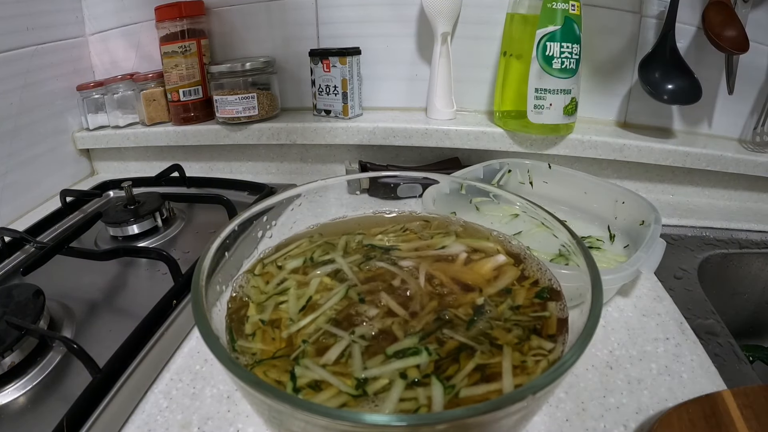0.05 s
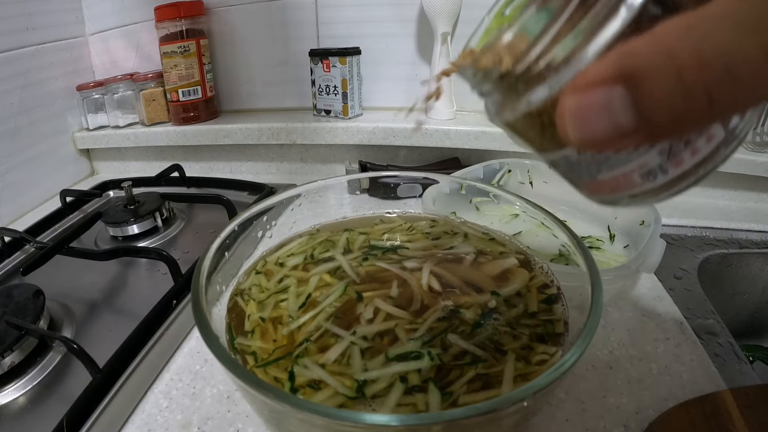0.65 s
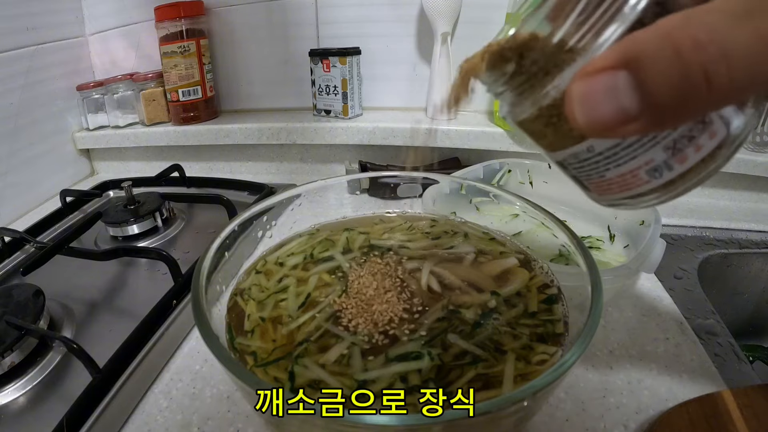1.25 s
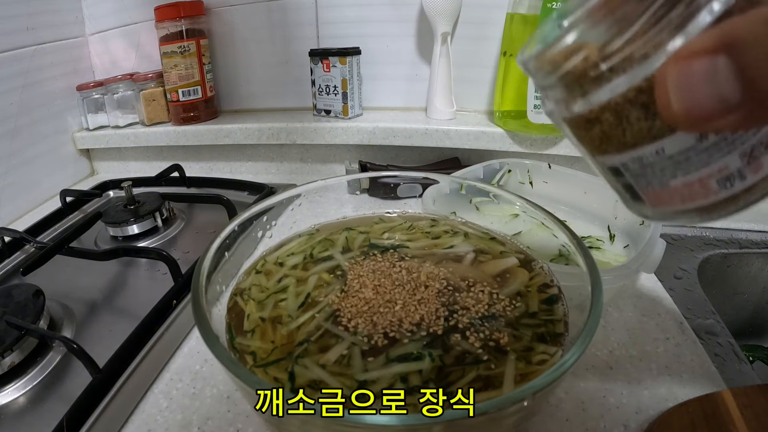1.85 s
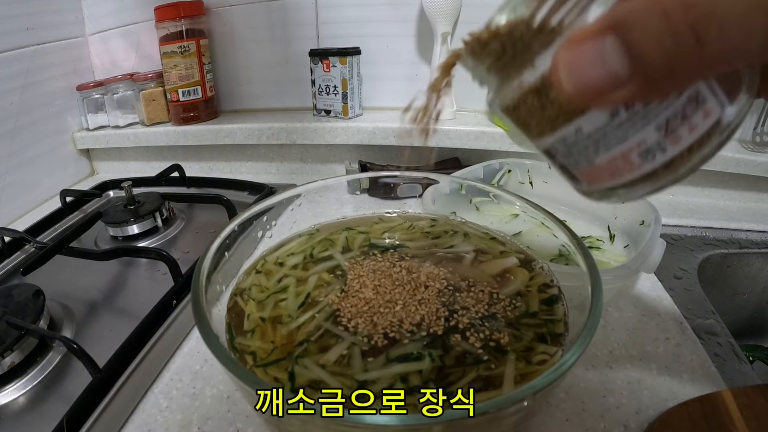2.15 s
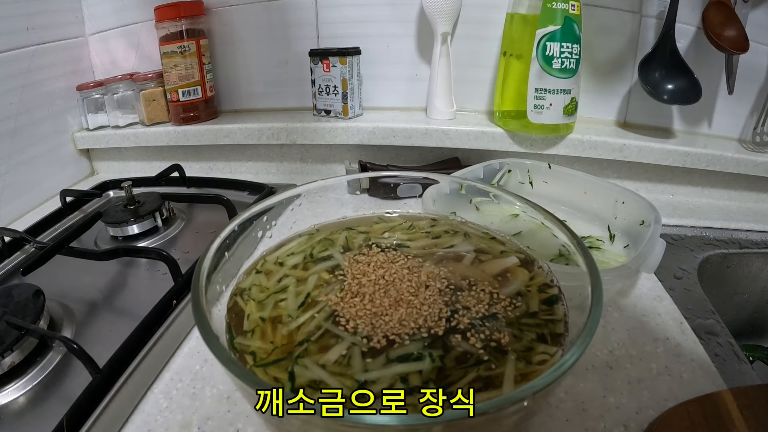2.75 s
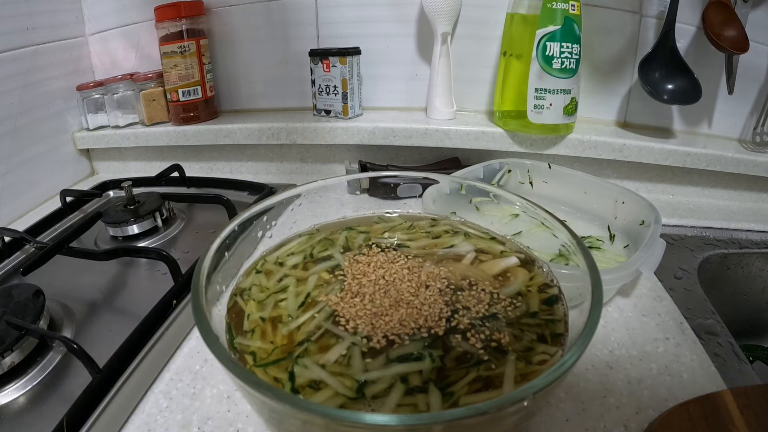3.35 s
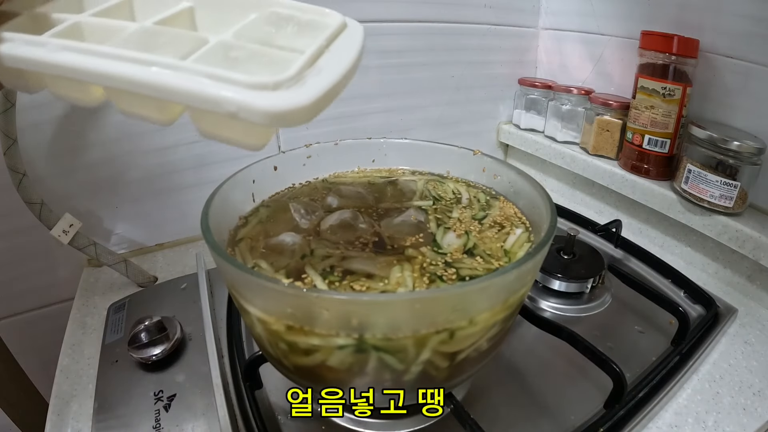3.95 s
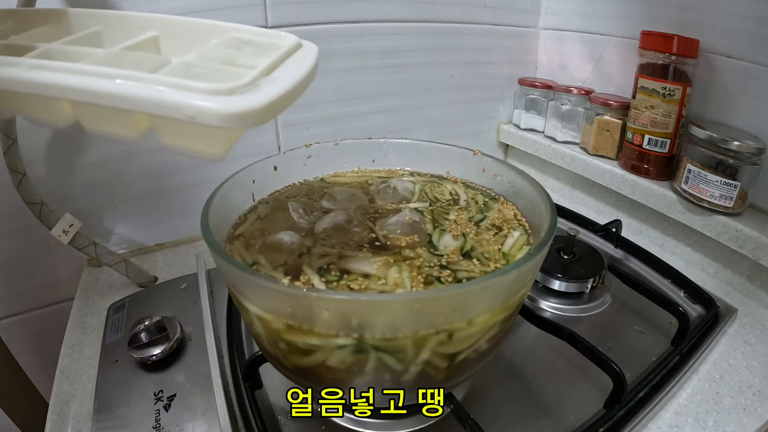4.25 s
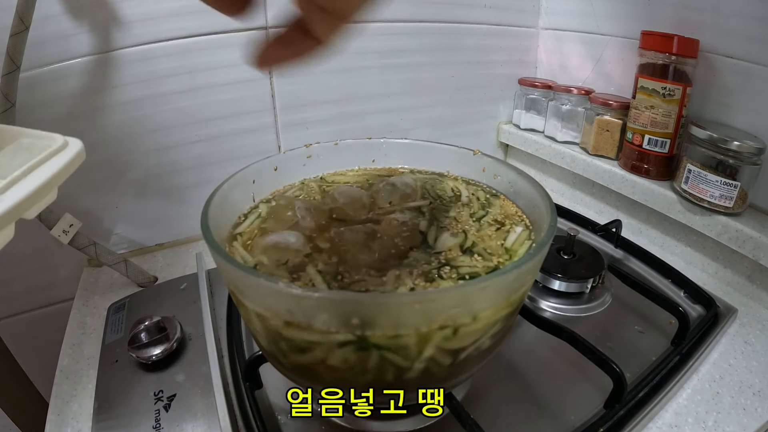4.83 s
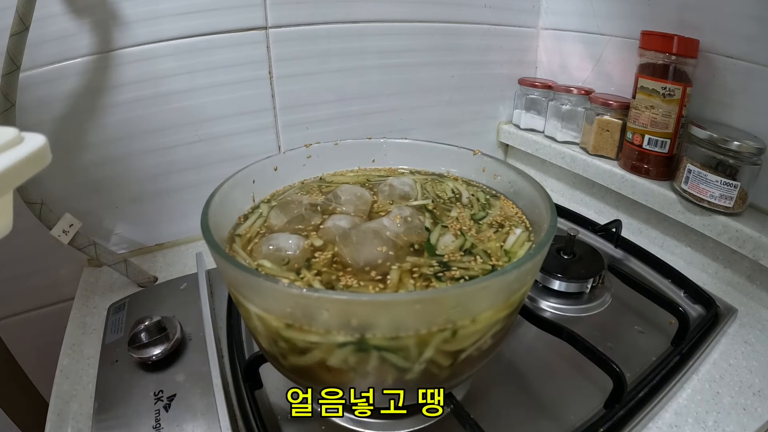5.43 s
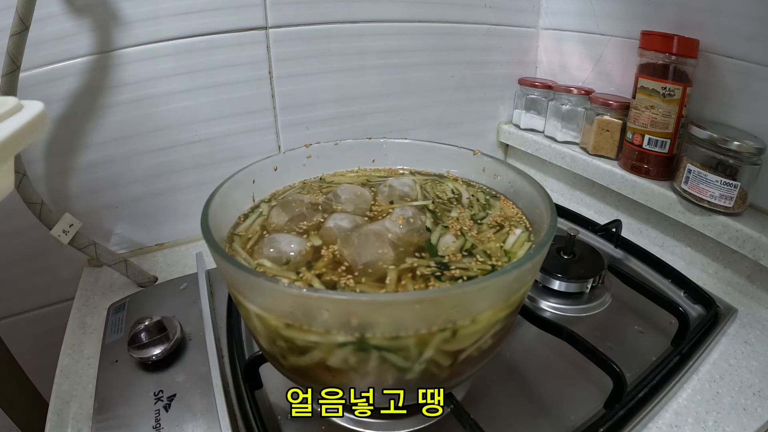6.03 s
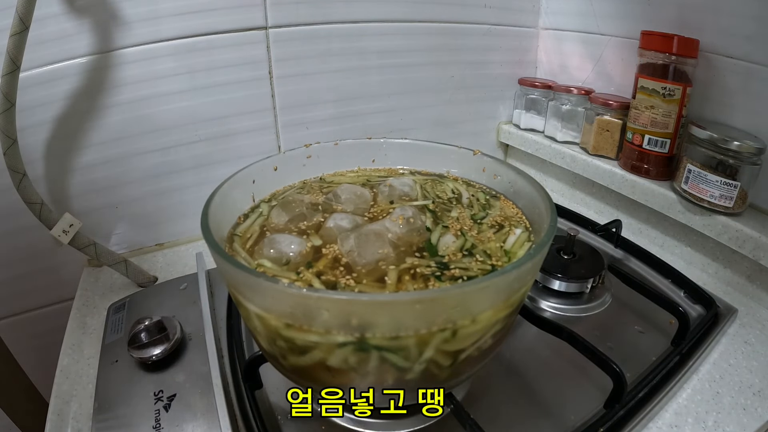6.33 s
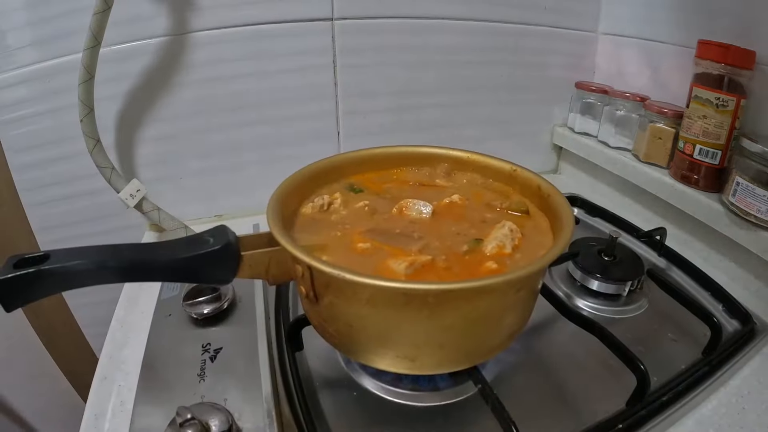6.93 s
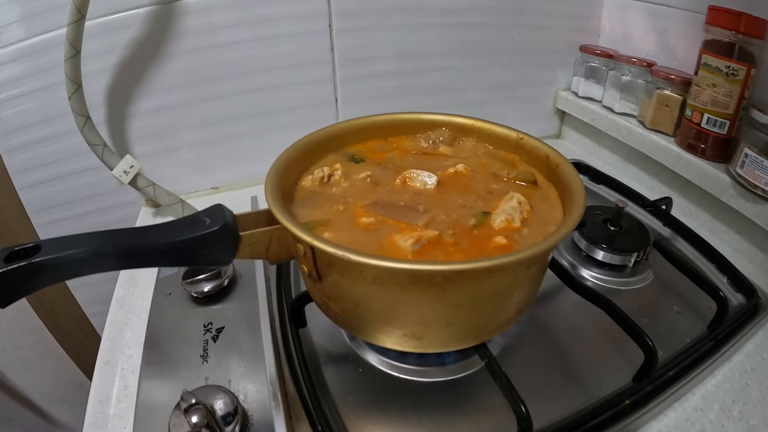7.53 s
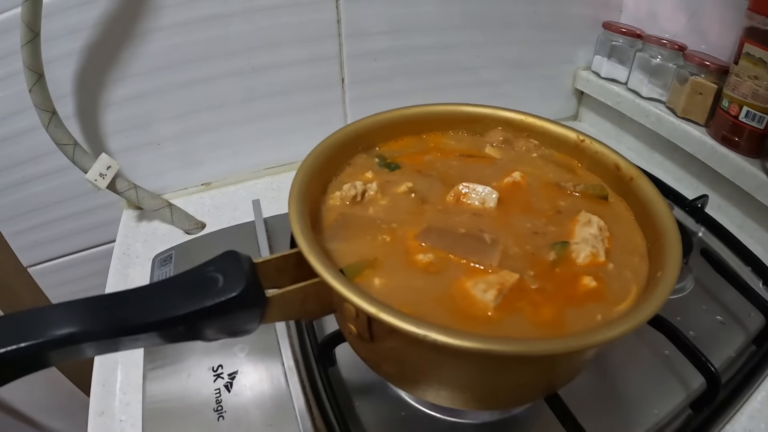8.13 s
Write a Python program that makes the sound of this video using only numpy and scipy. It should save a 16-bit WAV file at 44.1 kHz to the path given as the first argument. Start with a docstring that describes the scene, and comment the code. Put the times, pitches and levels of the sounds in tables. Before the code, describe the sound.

Seeds shaken from a glass jar, then ice cubes crack and clatter in a twisted plastic tray, before a gas burner roars softly.

```python
"""Ice cubes clatter, scrape and snap as a plastic tray is twisted; one plops into a glass bowl of cold
soup. Before that, in the same small tiled kitchen, a glass jar is picked up, sesame is shaken from it
onto the soup and the jar is set down. An appliance hums behind both scenes.
Last, after a short silence, a gas burner roars under a simmering stew."""
import sys
import numpy as np
from scipy import signal
from scipy.fft import rfft, irfft, next_fast_len
from scipy.io import wavfile
from scipy.ndimage import map_coordinates

SR = 44100
rng = np.random.default_rng(int(sys.argv[2]) if len(sys.argv) > 2 else 0)


def unload_audio(sound):
    """Save the sound as a 16-bit wav file, at the path given as the first command line argument."""
    columns = np.transpose(np.atleast_2d(sound))
    # keep every value between -1 and 1, then stretch to whole-number steps
    steps = np.round(np.clip(columns, -1, 1) * 32767)
    wavfile.write(sys.argv[1], SR, steps.astype(np.int16))


N = 360738
RING_SIZE = 16384  # samples in one hit or impulse response
T, RING_T, RING_HZ = np.arange(N) / SR, np.arange(RING_SIZE) / SR, np.fft.rfftfreq(RING_SIZE, 1 / SR)


# sharp, bright cracks of ice: start_s, level_db, low_edge_hz
ICE_CRACKS = [(3.5253, -9, 2320), (3.7972, 4.5, 1370), (3.8978, 4, 2120), (4.246, 9.5, 1850),
              (4.2961, 4, 1480), (4.525, -3.5, 3100), (4.866, -6, 4040), (4.9317, 4, 1360),
              (5.115, -24, 4000), (5.2533, 3.5, 1270), (5.3109, -4, 4600), (5.419, 4, 2800),
              (5.5784, -3, 2780), (6.0727, 0, 1820), (6.1794, 2.5, 1720), (6.462, -16.5, 4370),
              (6.784, -6.5, 3980)]
# whole cubes knocking in the tray or the bowl; the last row is a 2 kHz ring under a scrape: start_s, level_db,
# pitch_hz
CUBE_HITS = [(3.5722, 4.5, 1215), (3.9635, 6, 1493), (4.828, 3.5, 2030), (4.849, 1.5, 2165),
             (6.296, -5, 2010)]
# a cube goes under: start_s, level_db, t60_s
CUBE_DUNKS = [(4.25, -23.5, 0.016), (4.829, -32.5, 0.35)]
# tone of the gulp: freq_hz, gain_db
GULP_EQ = [(50, -9), (120, -15.5), (240, -10.5), (360, -32), (1500, -42.5)]

def ice():
    """Ice snaps as the tray is bent, cubes knock and ring; a sinking cube shoves soup aside: a gulp."""
    cracks = [(s, db, low_hz, 7840) for s, db, low_hz in ICE_CRACKS]
    cubes = [(s, db, hz, hz) for s, db, hz in CUBE_HITS]
    ring = np.zeros(N)
    for s, db, hz in CUBE_HITS:
        tone = np.sin(2 * np.pi * hz * RING_T + wobble(200, size=RING_SIZE))
        add(ring, s, amp(db - 29) * decay(0.11) * tone)
    push = sum(amp(db - 60 * np.abs(T - s) / t60) * (T > s) for s, db, t60 in CUBE_DUNKS)
    cracking = snaps(cracks, level_db=-2, t60=0.0059, wet_db=-1, pan_db=0.5)
    knocking = snaps(cubes, level_db=-2, t60=0.0073, wet_db=-1, pan_db=-0.5)
    return cracking + knocking + ring + push * eq_noise(GULP_EQ)


def snaps(rows, level_db, t60, wet_db, pan_db):
    """A sudden release: a spike and a few milliseconds of noise, coloured anew each time."""
    out = np.zeros((2, N))
    for s, db, low_hz, high_hz in rows:
        burst = rng.standard_normal(RING_SIZE) * decay(t60)
        burst[0] += 3.5  # the leading spike
        click = colour(burst, band(low_hz, high_hz, 4.14) + 0.17 * band(1200, 3600, 2.16))
        send_db = wet_db - max(db - 4.5, 0)  # the loudest snaps are drier
        add(out, s, kitchen(amp(db + level_db) * click / np.linalg.norm(click), send_db, pan_db))
    return out


# twists that break the cubes loose: start_s, level_db, high_edge_hz
TWISTS = [(3.571, -17, 6500), (3.693, -20.5, 1900), (3.707, -23, 2580)]
# body of the loaded tray: freq_hz, gain_db
TRAY_EQ = [(250, -22), (480, -7), (650, -3), (860, -9.5), (1150, -2.5), (1500, -5), (1780, -4.5),
           (2400, -5.5), (4300, -8), (10000, -26)]

def twists():
    """The tray gives way: cubes clatter densely in their cells and the plastic rings on, duller."""
    out = np.zeros(N)
    for s, db, top_hz in TWISTS:
        clatter, ring_out = (db, 0.17, top_hz), (db - 12, 0.81, 1900)
        for level_db, t60, edge_hz in (clatter, ring_out):
            contacts = amp(level_db) * decay(t60) * grains(2500, 2.9, size=RING_SIZE)
            add(out, s, excite(contacts, eq(TRAY_EQ) * band(100, edge_hz, 1.8)))
    return kitchen(amp(-2) * out, wet_db=-4, pan_db=3.5)


# cubes creaking in the tray: start_s, level_db, length_s
CUBE_SCRAPES = [(3.813, -14.5, 0.0063), (4.076, -16.5, 0.0083), (4.113, -28, 0.023), (4.172, -32, 0.015),
                (4.222, -23.5, 0.016), (4.488, -34, 0.0063), (5.187, -24, 0.018), (5.204, -19.5, 0.014),
                (5.233, -22.5, 0.0083), (5.367, -18.5, .013), (5.38, -19, 0.014), (5.408, -10.5, 0.0045),
                (5.527, -26.5, 0.0095), (5.552, -26.5, 0.012), (5.679, -37, 0.018), (5.763, -32.5, 0.018),
                (5.855, -33.5, 0.022), (5.888, -21.5, 0.022), (6.291, -17.5, 0.02), (6.341, -24.5, 0.021),
                (6.675, -34.5, 0.009), (6.787, -27, 0.013), (6.896, -34.5, 0.014)]
# tone of ice on plastic: freq_hz, gain_db
RUB_EQ = [(400, -19), (850, -20), (1630, -6), (2800, -9.5), (6300, -5.5), (8760, -17.5), (13000, -29),
          (16000, -47)]

def scrapes():
    """Loose cubes jostle in the tilted tray, tick while it is held bent and rub on the plastic."""
    creep = amp(-57.5) * swell(5.98, half_s=0.64) * grains(49, 4.6)
    jostle = amp(-41.5) * swell(3.79, half_s=0.18) * grains(500, 6.7)
    hollow = filtered(jostle, lambda hz: amp(-1) + resonances([(1300, 450, 3)], hz))
    rubbing = excite(creep + hollow, eq(RUB_EQ))
    for s, db, length_s in CUBE_SCRAPES:
        add(rubbing, s, amp(db) * stick_slip(length_s))
    return kitchen(rubbing, wet_db=1, pan_db=4.5)


def stick_slip(length_s):
    """Ice sticks and slips on plastic in uneven spurts; every stroke has a colour of its own."""
    force = np.exp(-(RING_T / length_s) ** 2) * (1 - np.exp(-RING_T / 0.0013))
    spurts = amp(3 * wobble(224, size=RING_SIZE))
    slips = force * spurts * grains(2600, 5, size=RING_SIZE)
    tone = eq(RUB_EQ) * amp(3.2 * wobble(96, size=len(RING_HZ)))
    return amp(-10.5) * np.sqrt(np.mean(force ** 2)) * colour(unit(slips), tone)


# the jar is picked up, later set down: start_s, level_db, hardness_db
JAR_HITS = [(0.003, -28.5, 2), (0.023, -30.5, 1), (0.13, -38, -2), (0.183, -35, -5.5), (0.199, -49, -3),
            (0.234, -36.5, 5), (0.393, -39, 0), (0.4192, -29, 1), (0.4316, -24, 5.5), (0.515, -38, -2),
            (3.177, -15.5, 11), (3.189, -9, -2), (3.265, -23.5, 2), (3.2919, -17, 1), (3.4086, -27, -2.5),
            (3.429, -21, -4), (3.4464, -16.5, 0)]
# modes of the jar on the shelf: pitch_hz, level_db, t60_s
SHELF_MODES = [(117, -2, 0.15), (266.6, -7.5, 0.12), (396, 7.5, 0.025), (507, -8, 0.08), (930, -20, 0.18),
               (2064, -10, 0.084), (2480, -24, 0.5), (3410, 7, 0.011), (4545, -23, 0.49)]
# modes of the jar on the counter: pitch_hz, level_db, t60_s
COUNTER_MODES = [(271.6, 1.5, 0.14), (373, -3, 0.044), (553, 0, 0.064), (677, -10, 0.2), (1223, -1, 0.14),
                 (1527, -1, 0.034), (2090, 1.5, 0.086), (2403, 6, 0.065), (2540, -4.5, 0.099),
                 (2990, 1.5, 0.07), (4580, 1.5, 0.099), (5500, 5.5, 0.066), (6830, 4.5, 0.11)]
# slides along the shelf: centre_s, level_db, half_length_s
JAR_DRAGS = [(0.074, -46, 0.087), (0.37, -50.5, 0.04), (0.54, -44, 0.038)]

def jar():
    """The glass jar drags and knocks on the shelf; set down, it rings and grinds into place."""
    hits = np.array(JAR_HITS)
    lifted = hits[:, 0] < 1
    pick_up = knocks(hits[lifted], SHELF_MODES, press=0, low_hz=98, thud_db=21, clack_db=18.5,
                     edge_db=10.5, rattle_db=8, rattle_t60=0.079, wet_db=3, pan_db=1.5)
    set_down = knocks(hits[~lifted], COUNTER_MODES, press=0.46, low_hz=212, thud_db=14.5, clack_db=16.5,
                      edge_db=10, rattle_db=11, rattle_t60=0.13, wet_db=-3.5, pan_db=3)
    sliding = sum(amp(db) * swell(s, half_s) for s, db, half_s in JAR_DRAGS)
    drag_peaks = [(hz, 0.12 * hz, -15 * np.log10(hz)) for hz, _, _ in SHELF_MODES]
    drag = sliding * noise(lambda hz: resonances(drag_peaks, hz))
    grind = amp(-27) * swell(3.46, half_s=0.013) * noise(lambda hz: resonances([(2150, 560, 0)], hz) ** 2)
    return pick_up + set_down + drag + grind


def knocks(rows, modes, press, low_hz, thud_db, clack_db, edge_db, rattle_db, rattle_t60, wet_db, pan_db):
    """Each hit rings the modes and rattles; a harder contact has more edge and less thud."""
    out = np.zeros((2, N))
    for s, db, hard_db in rows:
        sound = np.zeros(N)
        # as the hand presses down, later hits ring shorter and lose low end
        grip = 1 + press * (s - rows[0, 0]) / (rows[-1, 0] - rows[0, 0])
        edges_hz = [(low_hz * grip, 690), (1000, 3060), (3900, 6170)]  # thud, clack, edge
        levels_db = [thud_db - hard_db, clack_db + 0.29 * hard_db, edge_db + hard_db]
        for touch_s, touch_db in [(s, db), (s + 0.015, db - 11)]:  # it rocks and touches again
            ring = np.zeros(RING_SIZE)
            for hz, mode_db, t60 in modes:
                envelope = amp(mode_db + rng.normal(0, 1.5)) * decay(t60 / grip)
                ring += envelope * np.sin(2 * np.pi * hz * (1 + rng.normal(0, 0.008)) * RING_T)
            rattle = amp(rattle_db) * decay(rattle_t60 / grip) * grains(5000, 13, size=RING_SIZE)
            for (low, high), band_db in zip(edges_hz, levels_db):
                layer = colour(ring + rattle, band(low, high, 3.98))
                add(sound, touch_s, amp(touch_db + band_db) * layer / np.linalg.norm(layer))
        out += kitchen(sound, wet_db, pan_db)
    return out


# shakes of the jar: centre_s, level_db, half_length_s, spill_share
JAR_SHAKES = [(0.711, -46.5, 0.015, 0), (0.933, -49, 0.014, 0.44), (1.151, -48, 0.0082, 0.66),
              (1.351, -52, 0.011, 0.4), (1.512, -49.5, 0.011, 0), (1.95, -53.5, 0.018, 0),
              (2.219, -51.5, 0.024, 1), (2.457, -50, 0.0095, 0.21), (2.823, -61.5, 0.047, 0)]
# air resonances in the jar: pitch_hz, width_hz, level_db
JAR_CAVITY = [(2970, 134, -1.5), (5834, 134, -3), (6700, 180, -13), (7610, 123, 0), (10500, 470, -17.5),
              (12100, 400, -20.5)]
# tone of seeds on soup: freq_hz, gain_db
PATTER_EQ = [(1500, 2), (3400, -9), (4400, -18.5), (6100, -4), (8500, -9.5), (11500, -12), (16000, -33)]
# the heaviest seeds landing: start_s, level_db, pitch_hz
HEAVY_SEEDS = [(1.1066, -33, 6900), (1.7365, -31, 7890), (2.358, -32, 6050), (2.398, -28.5, 5860),
               (2.592, -31.5, 7100)]

def sesame(fall_s=0.072, attack_s=0.011, landing_s=0.32):
    """Each shake sounds the air in the jar; spilled seeds patter on the soup a moment later."""
    shake, landing = np.zeros(N), np.zeros(N)
    for s, db, half_s, spill in JAR_SHAKES:
        air = [(hz, width, level + rng.normal(0, 4.5)) for hz, width, level in JAR_CAVITY]
        shake += amp(db) * swell(s, half_s) * excite(grains(9000, 1.6), np.abs(resonances(air, RING_HZ)))
        since = np.maximum(T - s - fall_s, 0)
        landing += spill * (1 - np.exp(-since / attack_s)) * np.exp(-(since / landing_s) ** 2)
    # seeds of different sizes tick at different pitches
    seeds = unit(sum(filtered(grains(190, 4.5), lambda hz: resonances([(pitch, pitch / 4, 0)], hz) ** 2)
                     for pitch in np.geomspace(3300, 13500, num=14)))
    spurts = amp(-50 + 5 * wobble(20))
    patter = excite(spurts * landing * seeds, eq(PATTER_EQ))
    for s, db, hz in HEAVY_SEEDS:  # a tick and a tiny bubble that rises in pitch
        bubble = decay(0.0078) * np.sin(2 * np.pi * hz * RING_T * (1 + 14 * RING_T))
        add(patter, s, amp(db + 0.5) * (bubble + impulse(band(4200, 7900, 4.4))))
    return kitchen(amp(4) * shake + patter, wet_db=-6, pan_db=-0.5)


# fader moves of the flame: time_s, roar_db, hiss_db
FLAME_FADERS = [(7.06, -22, -37), (7.096, -22, -36), (7.576, -25.5, -35.5), (7.698, -23.5, -37.5),
                (8.18, -31, -41)]
# tone of the flame: freq_hz, gain_db
ROAR_EQ = [(15, -5), (34, 9.5), (50, -4), (110, -8.5), (170, -12.5), (210, -22.5), (265, -17), (320, -47),
           (1000, -77)]
# tone of the gas: freq_hz, gain_db
HISS_EQ = [(180, -7.5), (300, 0), (820, -4), (1500, -9), (2170, -13), (3400, -18), (5300, -15),
           (7370, -19.5), (8500, -31), (11500, -29), (15500, -69)]
# burner resonances: pitch_hz, width_hz, level_db
BURNER_PEAKS = [(1057, 40, 5.5), (1540, 130, -0.5), (2710, 140, -3), (5330, 160, -4.5), (6560, 83, -3.5)]
# a pop in the stew: start_s, level_db, low_edge_hz, high_edge_hz
STEW_POPS = [(7.691, -15, 2980, 4360)]

def stove():
    """The flame flutters, gas hisses through the burner's resonances and the stew simmers."""
    roar_db, hiss_db = faders(FLAME_FADERS)
    roar = amp(roar_db + 2 + wobble(41)) * eq_noise(ROAR_EQ)
    gas = amp(-1 + 0.79 * wobble(25)) * eq_noise(HISS_EQ)
    gas += amp(-9.5) * noise(lambda hz: resonances(BURNER_PEAKS, hz))
    fizz = excite(grains(600, 4.1), band(910, 1550, 2.14))
    simmer = amp(hiss_db - 5.5 + wobble(8.1)) * fizz
    pop = snaps(STEW_POPS, level_db=4.5, t60=0.0062, wet_db=-5, pan_db=-4)
    return roar * amp([[-1.4], [1.4]]) + amp(hiss_db) * gas + simmer + pop


# partials of the appliance: pitch_hz, level_db
HUM_PARTIALS = [(59.2, -59.5), (118.4, -56), (263.8, -65), (635.2, -75.5)]
# fader moves of the rumble: time_s, level_db
RUMBLE_FADER = [(0.0, -30), (3.06, -31.5), (3.59, -41), (5.75, -32), (6.9, -35.5)]
# tone of the rumble: freq_hz, gain_db
RUMBLE_EQ = [(15, -42), (25, -10), (29, 3), (36, -4), (41, -10), (48, -14), (90, -75)]
# tone of the room's air: freq_hz, gain_db
AIR_EQ = [(41, -23.5), (70, -21), (138, -26), (185, -33), (280, -31), (500, -40), (850, -52.5), (1500, -36),
          (2300, -48), (3400, -51), (4500, -60), (7400, -47.5), (9000, -67.5), (16000, -110)]

def room_tone():
    """An appliance hums over a deep throbbing rumble and faint air noise."""
    hum = sum(amp(db + 1.5 + wobble(2.08)) * np.sin(2 * np.pi * hz * T + 0.5 * wobble(2.6))
              for hz, db in HUM_PARTIALS)
    rumble = amp(faders(RUMBLE_FADER)[0] + 2) * eq_noise(RUMBLE_EQ)
    return hum + rumble + amp(-53.5) * eq_noise(AIR_EQ)


# reverb time of the tiled room: freq_hz, t60_s
ROOM_DECAY = [(200, 0.42), (6000, 0.23), (14000, 0.27)]

def kitchen(x, wet_db, pan_db, wide_above_hz=1100, predelay_s=0.0012):
    """Pan a sound (positive is left) and let the tiles answer; only short waves spread wide."""
    hz, t, spectra = signal.stft(rng.standard_normal((2, RING_SIZE)), SR, nperseg=256)
    spectra = spectra * amp(-60 * t / along(ROOM_DECAY, hz)[:, None])
    spectra[1] *= (hz / np.hypot(hz, wide_above_hz))[:, None]
    mid, side = signal.istft(spectra, SR, nperseg=256)[1][:, :RING_SIZE]
    near_walls = 1 + 2.6 * np.exp(-RING_T / 0.0083)
    tails = np.array([mid + side, mid - side]) * (RING_T > predelay_s) * near_walls
    response = amp(wet_db) * tails / np.linalg.norm(tails[0])
    response[:, 0] += 1  # direct sound
    return amp([[pan_db / 2], [-pan_db / 2]]) * signal.fftconvolve(x[None], response, axes=1)[:, :N]


# stereo image of the noise layers: freq_hz, left_right_correlation
STEREO_IMAGE = [(30, 1), (90, 1), (1000, 0.59), (12000, 0.78)]

def noise(response):
    """Shaped stereo noise, mono in the bass, with its mid at rms 1."""
    def mid_side(hz):
        angle = np.arccos(np.clip(along(STEREO_IMAGE, hz), -1, 1)) / 2
        return response(hz) * np.array([np.cos(angle), np.sin(angle)])
    mid, side = filtered(rng.standard_normal((2, N)), mid_side)
    return np.array([mid + side, mid - side]) / np.std(mid)


def eq_noise(points):
    """Stereo noise through an EQ curve."""
    return noise(lambda hz: eq(points, hz))


def grains(rate, spread_db, size=N):
    """Tiny impacts at random times, a few much larger than the rest."""
    hits = (rng.random(size) < rate / SR) * np.sign(rng.standard_normal(size))
    return unit(hits * amp(spread_db * np.minimum(rng.exponential(size=size), np.pi)))


def amp(db):
    """Decibels to gain."""
    return 10 ** (np.asarray(db) / 20)


def unit(x):
    """Scale to rms 1."""
    return x / np.sqrt(np.mean(x ** 2) + 1e-20)


def decay(t60):
    """An envelope that falls 60 dB in t60 seconds."""
    return amp(-60 * RING_T / t60)


def swell(centre_s, half_s):
    """A smooth rise and fall around a moment."""
    return np.exp(-.5 * ((T - centre_s) / half_s) ** 2)


def faders(rows):
    """One value per sample for each column after the time."""
    times, *columns = np.transpose(rows)
    return [np.interp(T, times, column) for column in columns]


def wobble(rate, size=N):
    """A smooth random curve, rate knots a second."""
    return map_coordinates(rng.standard_normal(int(size * rate / SR) + 4), [T[:size] * rate])


def along(points, hz):
    """Interpolate (freq_hz, value) points on a log axis."""
    freqs, values = np.transpose(points)
    return np.interp(np.log(hz + 1), np.log(freqs + 1), values)


def eq(points, hz=RING_HZ):
    """Gain of an EQ curve."""
    return amp(along(points, hz))


def band(low_hz, high_hz, slope):
    """Gain of a pass band with sloping skirts."""
    low_cut = 1 + (low_hz / (RING_HZ + 1)) ** (2 * slope)
    high_cut = 1 + (RING_HZ / high_hz) ** (2 * slope)
    return (low_cut * high_cut) ** -.5


def resonances(peaks, hz):
    """Causal response of (pitch_hz, width_hz, level_db) peaks."""
    return sum((-1) ** k * amp(db) * 1j * hz * width / (pitch ** 2 - hz ** 2 + 1j * hz * width)
               for k, (pitch, width, db) in enumerate(peaks))


def impulse(gain):
    """The minimum-phase impulse response of a gain curve, at energy 1."""
    cepstrum = irfft(np.log(np.maximum(gain / gain.max(), 1e-6)))
    cepstrum[1:RING_SIZE // 2] *= 2
    cepstrum[RING_SIZE // 2 + 1:] = 0
    response = irfft(np.exp(rfft(cepstrum)))
    return response / np.linalg.norm(response)


def excite(x, gain):
    """Let x ring a body with this gain curve."""
    return signal.fftconvolve(x, impulse(gain))[:N]


def colour(hit, gain):
    """Shape one hit with a gain curve, keeping its length."""
    return irfft(rfft(hit) * rfft(impulse(gain)))


def filtered(x, response):
    """Filter a whole track by a function of frequency."""
    size = next_fast_len(N + SR // 2)
    return irfft(rfft(x, size) * response(np.fft.rfftfreq(size, 1 / SR)), size)[..., :N]


def add(track, s, x):
    """Mix x into the track from time s."""
    start = max(round(s * SR), 0)
    track[..., start:start + x.shape[-1]] += x[..., :N - start]


def scene():
    """Garnish cuts straight to the ice tray; after a short silence the stove fades in."""
    tray_s, silence_s, stove_s = 3.478, 6.918, 6.995
    garnish = (jar() + sesame()) * (T < tray_s)
    tray = (scrapes() + twists()) * (T >= tray_s)
    cold_soup = (garnish + tray + ice() + room_tone()) * np.clip((silence_s - T) / 0.004, 0, 1)
    return cold_soup + stove() * np.clip((T - stove_s) / 0.095, 0, 1)


# microphone colour: freq_hz, gain_db
MIC_EQ = [(9000, 0), (13000, 1.5), (15000, -4), (16000, -47)]

def record(dry):
    """The microphone hears the left a little late and rolls off steeply at the very top."""
    left_lag_s, top_hz = 0.000016, 15900
    delays_s = np.array([[0.5], [-0.5]]) * left_lag_s
    heard = filtered(dry, lambda hz: eq(MIC_EQ, hz) * np.exp(-2j * np.pi * hz * delays_s))
    return filtered(heard, lambda hz: 1 / (1 + (hz / top_hz) ** 80))


dry = scene()
out = record(dry)
unload_audio(out)
```